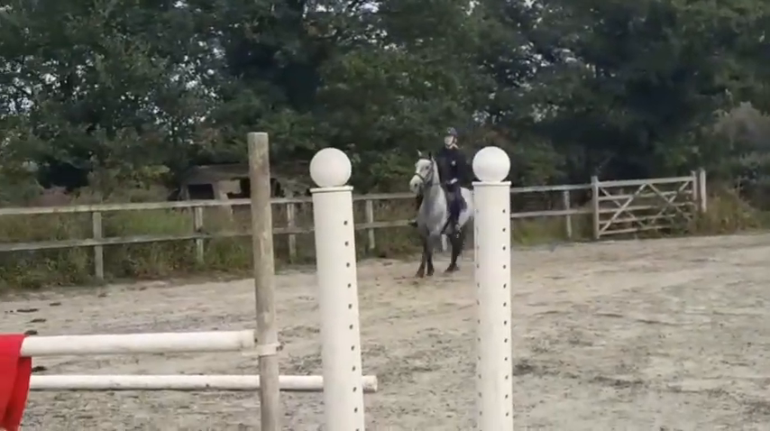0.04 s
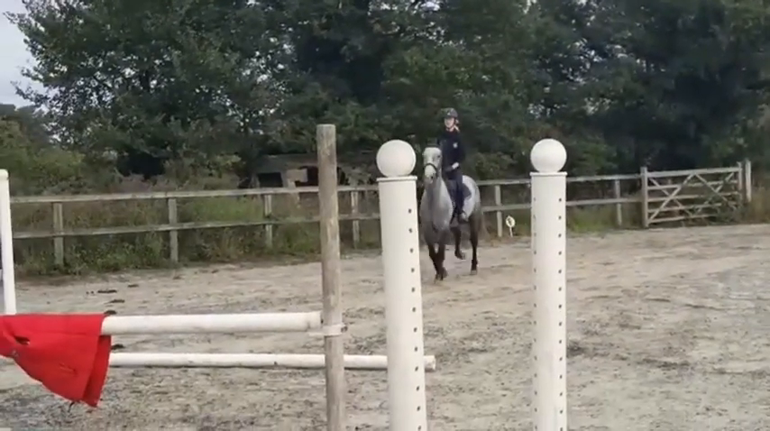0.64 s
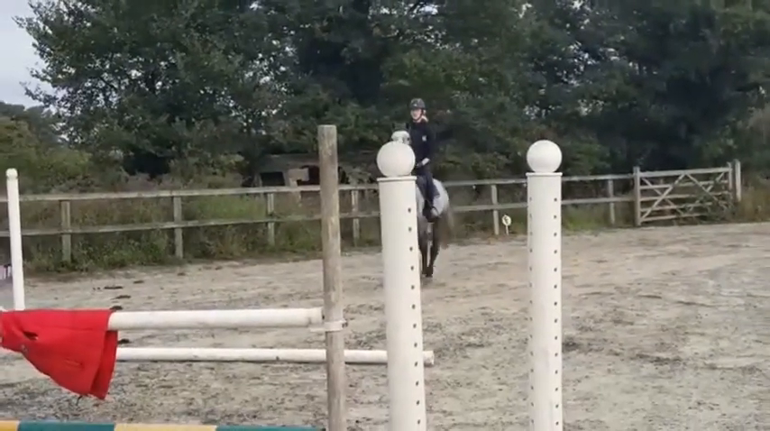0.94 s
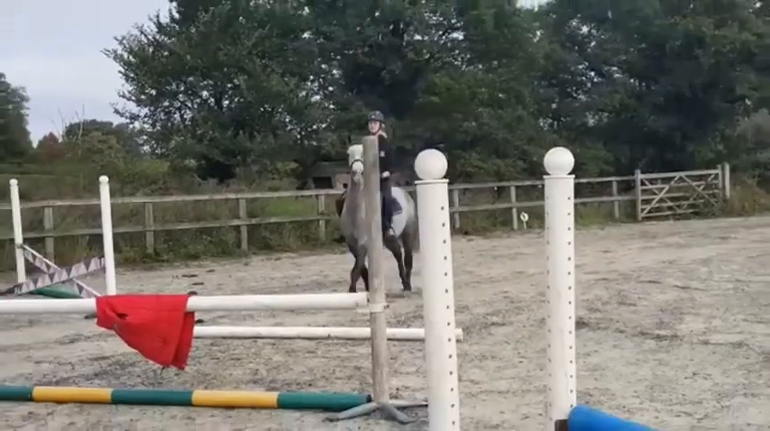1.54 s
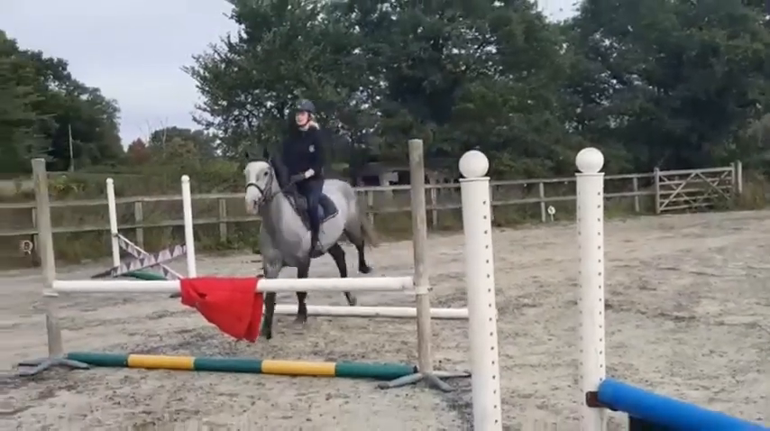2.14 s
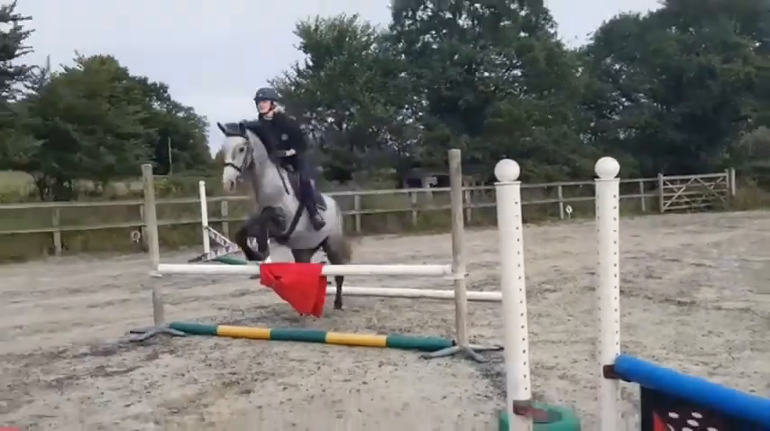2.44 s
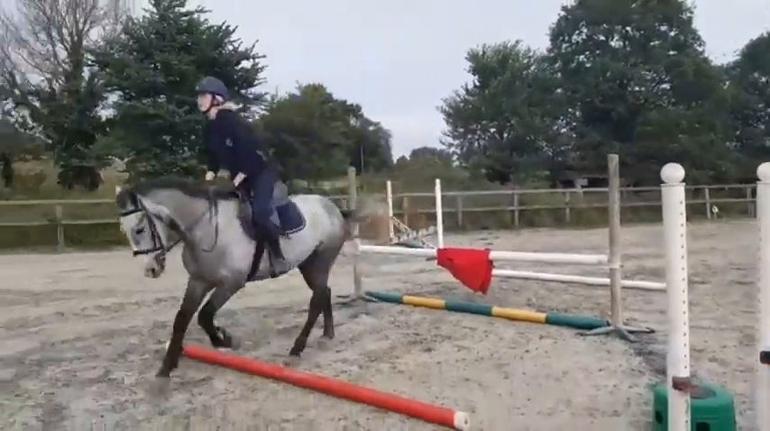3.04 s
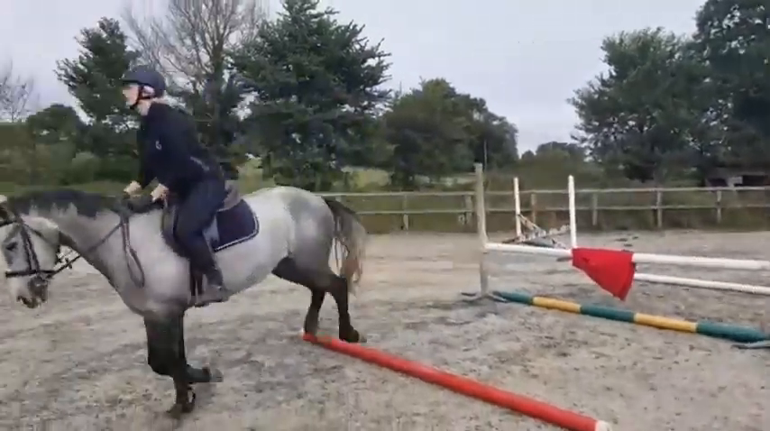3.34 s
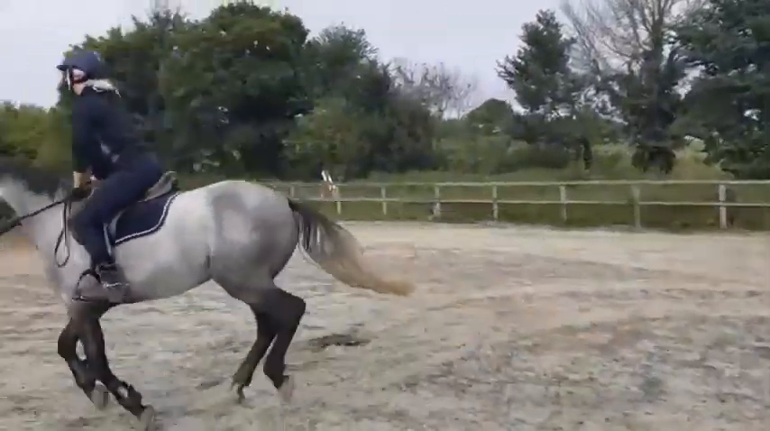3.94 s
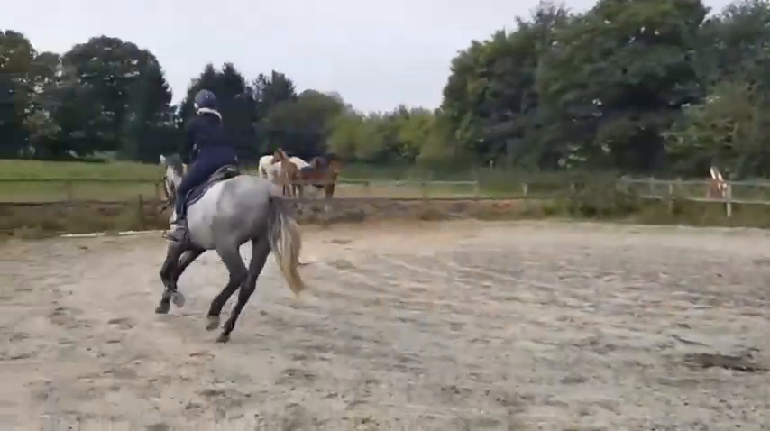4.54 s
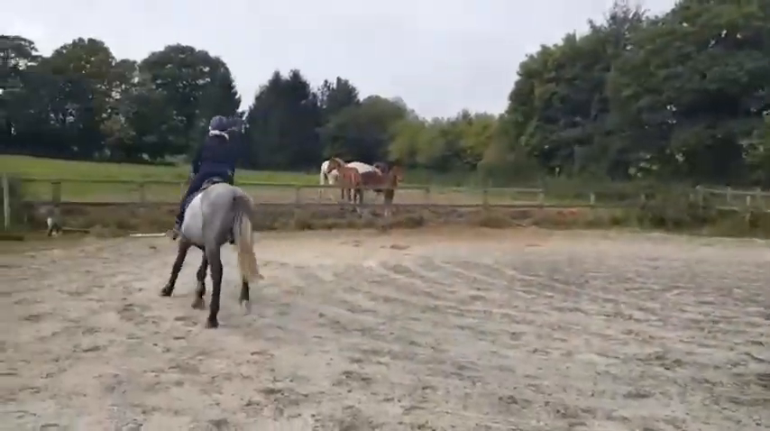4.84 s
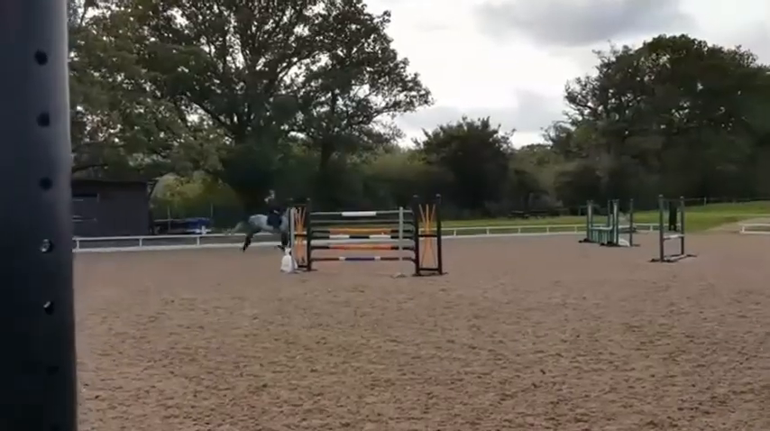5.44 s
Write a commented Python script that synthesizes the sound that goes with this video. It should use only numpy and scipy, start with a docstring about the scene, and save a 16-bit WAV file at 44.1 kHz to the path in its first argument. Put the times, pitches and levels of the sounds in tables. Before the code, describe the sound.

From the start, wind rustles steadily through trees, mostly on the right, and a distant engine idles with a low hum. A horse canters on an outdoor sand arena, its scattered hollow knocks, thumps and scuffs fairly soft at first, with a firmer pair at about 2.1 seconds as it takes off over a jump. It lands around 2.8 seconds with a heavy crunch, cracking grit and grating stones. The horse then passes close, its loudest hoofbeats at about 3.2, 3.9 and 4.4 seconds, while thrown sand hisses down on the left and coarse grains tick. A short creak, like saddle leather, comes at 3.6 seconds. At 4.9 seconds everything cuts to a brief silence. From 5 seconds a much quieter arena follows, with slowly swelling far traffic, a faint motor drone and four tiny bird chirps between 5.1 and 5.4 seconds.

```python
"""A sand riding arena: a horse canters round, hops a pole and passes close by. Each hoof knocks hollow,
thumps the ground and crunches in; stones grate, grit cracks and thrown sand sifts down on the left.
Wind rustles the trees to the right and an engine idles in the distance.
After a short silence the scene changes to a much quieter arena with far traffic, motors and a small bird."""
import sys
import numpy as np
from scipy import signal
from scipy.fft import rfft, irfft, next_fast_len
from scipy.io import wavfile
from scipy.ndimage import map_coordinates

SR = 44100
rng = np.random.default_rng(int(sys.argv[2]) if len(sys.argv) > 2 else 0)


def persist_wave(psi):
    """Save psi, clipped to +-1, as 16-bit WAV."""
    counts = np.round(np.clip(psi, -1, 1) * 32767).astype(np.int16)
    wavfile.write(sys.argv[1], SR, np.atleast_2d(counts).T)


N = 246062
TIME = np.arange(N) / SR

# Hoofbeats. Each row: time in seconds, clop level in dB, clop pitch in Hz, thump level in dB, thump in Hz.
HOOFBEATS = [(0.0765, -24, 590, -46, 213), (0.629, -48, 450, -42, 200), (1.125, -30.5, 536, -38, 170),
             (1.2915, -37, 450, -29, 182), (1.596, -27, 556, -31, 243), (1.7331, -26.5, 650, -36, 263),
             (2.0841, -21, 594, -24.5, 200), (2.1704, -24.5, 430, -14, 192), (2.843, -28.5, 447, -29, 244),
             (2.857, -37, 440, -28, 190), (2.873, -42, 440, -26, 138), (2.901, -37, 700, -29, 139),
             (2.9133, -36, 400, -23.5, 250), (3.2194, -14, 555, -23, 174), (3.232, -29, 800, -33, 150),
             (3.2548, -12, 417, -16, 207), (3.3988, -27.5, 474, -24.5, 215), (3.651, -34, 600, -48, 200),
             (3.793, -31.5, 450, -25.5, 125), (3.9184, -8.5, 664, -13.5, 252),
             (3.9338, -20.5, 580, -34, 263), (4.093, -29.5, 650, -31.5, 227), (4.277, -35, 606, -40, 178),
             (4.4411, -13.5, 656, -24, 241), (4.852, -36, 700, -32, 173)]
# The hoof's hollow ring. Each row: pitch in Hz, level against the clop in dB, swell in seconds.
HOOF_MODES = [(343, -11, 0.0023), (695, -22, 0.0025)]
# The dull crunch of sand packing down. Each row: frequency in Hz, level in dB.
CRUNCH_EQ = [(30, -40), (70, 7.5), (130, -12), (280, 3.5), (450, -9), (650, -7), (1050, -12.5),
             (1350, -13.5), (3000, -35), (6000, -46.5), (12000, -47)]
# Weight on the crunch, greatest as the jump lands. Each row: time in seconds, boost in dB.
CRUNCH_WEIGHT = [(2.75, 7), (2.84, 8), (2.93, 19.5), (3.05, 10.5)]

def hooves():
    """Each sole lands with one pulse; hoof and ground ring, and the sand crunches under the weight."""
    clop_cycles, crunch_db, crunch_db_per_clop_db = 0.57, -33, 0.53
    knocks, crush = np.zeros(N), np.zeros(N)
    lead_s = .01
    t = np.arange(SR // 6) / SR - lead_s
    crush_shape_db = -60 * np.abs(t) / np.where(t < 0, .025, .064)  # quick attack, longer tail
    for s, db, clop_hz, thump_db, thump_hz in HOOFBEATS:
        pulse = np.cos(2 * np.pi * clop_hz * t) * np.exp(-(clop_hz * t / clop_cycles) ** 2)
        hollow = sum(amp(level) * ring(t, hz, swell, order=1) for hz, level, swell in HOOF_MODES)
        thump = amp(thump_db) * ring(t, thump_hz, swell_s=0.0023, order=1)
        add(knocks, s - lead_s, amp(db) * (pulse + hollow) + thump)
        add(crush, s - lead_s, amp(crunch_db_per_clop_db * db + crush_shape_db))
    crunch = amp(curve(CRUNCH_WEIGHT) + crunch_db) * crush * coloured(rng.standard_normal(N), CRUNCH_EQ)
    cushioned = filtered(knocks, lambda hz: 1 / np.sqrt(1 + (hz / 1100) ** 14))  # sand softens the blow
    return (cushioned + crunch) * amp([[-.4], [-.7]])


# Small stones under a hoof. Each row: start in seconds, relative peak in dB, pitch in Hz.
STONE_HITS = [(2.1692, -35.5, 1120), (2.837, -43, 990), (2.843, -29.5, 1330), (2.901, -40, 1350),
              (2.915, -41, 1500), (3.115, -44, 1690), (3.22, -35, 1400), (3.393, -46, 1050),
              (3.465, -47, 1120), (3.596, -40, 2300), (3.9177, -33.5, 2250), (4.0915, -42.5, 1650),
              (4.169, -37.5, 1820), (4.501, -41.5, 1690), (4.654, -40, 1780)]

def stones():
    """A struck stone grates for a few milliseconds against its neighbours."""
    out, t = np.zeros((2, N)), np.arange(SR // 25) / SR
    for s, db, hz in STONE_HITS:
        contacts = rng.standard_normal((2, len(t))) * amp(-60 * t / .024)
        grate = signal.fftconvolve(contacts, ring(t, hz, swell_s=0.76 / hz)[None], axes=1)
        add(out, s, amp(db + 9.0) * grate / np.abs(grate).max(axis=1, keepdims=True))
    return out


# Coarse grit cracking under a hoof. Each row: start in seconds, relative peak in dB.
GRIT_CRACKS = [(2.836, -19.5), (3.061, -38), (3.115, -32), (3.2162, -29), (3.244, -40), (3.252, -24),
               (3.393, -26.5), (3.64, -43), (3.76, -26), (3.9177, -22), (3.98, -45), (4.122, -37),
               (4.169, -26.5), (4.3467, -25), (4.348, -30), (4.469, -28), (4.741, -34), (4.793, -37)]
# Their bright snap. Each row: frequency in Hz, level in dB.
CRACK_EQ = [(600, -29), (2000, -26), (3200, -24), (4200, 17), (5000, -6), (6200, 2.5), (8500, -4),
            (12000, -7.5), (15500, -20)]

def cracks():
    """Grit gives way at once, in a quickly fading cluster of sharp clicks."""
    out, t = np.zeros((2, N)), np.arange(SR // 25) / SR
    colour = amp(along(CRACK_EQ, np.fft.rfftfreq(2 * len(t), 1 / SR)))
    decay_s = 0.016
    for s, db in GRIT_CRACKS:
        clicks = rng.standard_normal((2, len(t))) ** 3 * amp(-60 * t / decay_s)
        burst = irfft(rfft(clicks, 2 * len(t)) * colour)[:, :len(t)]
        add(out, s, amp(db - 2.0) * burst / np.abs(burst).max(axis=1, keepdims=True))
    return out


# Hooves dragging or digging in. Each row: start in seconds, relative level in dB, swell in seconds.
SCUFFS = [(0.14, -58.5, 0.038), (0.328, -55, 0.019), (0.508, -52, 0.008), (0.845, -51, 0.027),
          (0.925, -55, 0.013), (1.025, -56, 0.017), (1.168, -46, 0.02), (1.297, -48, 0.012),
          (1.52, -55, 0.032), (1.583, -47, 0.029), (1.696, -46.5, 0.016), (1.86, -54, 0.026),
          (2.078, -47.5, 0.017), (2.167, -48.5, 0.0027), (2.214, -52.5, 0.017), (2.277, -52.5, 0.015),
          (2.355, -54.5, 0.028), (2.42, -55, 0.04), (2.503, -52, 0.017), (2.835, -46, 0.0039),
          (2.842, -55.5, 0.033), (2.896, -49, 0.0066), (3.052, -53, 0.0092), (3.11, -51.5, 0.0037),
          (3.214, -52.5, 0.005), (3.25, -42.5, 0.0028), (3.39, -52.5, 0.0016), (3.462, -70, 0.0058),
          (3.635, -48.5, 0.013), (3.755, -50, 0.0097), (3.775, -52.5, .014), (3.915, -38, 0.0022),
          (3.934, -56, 0.018), (3.976, -46.5, 0.0033), (4.164, -47.5, 0.012), (4.308, -52, 0.013),
          (4.341, -48, 0.0043), (4.465, -62, 0.0035), (4.682, -52.5, 0.017), (4.788, -56.5, 0.015)]

def sand_flow():
    """How much sand is moving: a swell for each scuff, each landing and the light shuffles in between."""
    kick_db, kick_db_per_clop_db, kick_swell_s = -47.5, 0.34, 0.0051
    shuffles_per_s, shuffle_db, shuffle_swell_s = 4.1, -63.5, 0.036
    kicks = [(s, kick_db + kick_db_per_clop_db * db, kick_swell_s) for s, db, *_ in HOOFBEATS]
    shuffle_times = (np.arange(64) + rng.random(64)) / shuffles_per_s
    shuffles = [(s, shuffle_db, shuffle_swell_s) for s in shuffle_times]
    clumps = unit(amp(2.5 * np.tanh(wobble(per_second=150))))  # sand gives way in small uneven slips
    return clumps * swells(SCUFFS + kicks + shuffles)


# Bright grain collisions. Each row: frequency in Hz, level in dB.
COLLISION_EQ = [(200, 14.5), (700, 11.5), (1500, 20), (2300, -36), (3200, 15), (4300, 7.5), (5600, 13),
                (6700, 9.5), (8300, 14), (10300, 0), (12000, 2), (15500, -16)]
# The rasp of shearing sand. Each row: frequency in Hz, level in dB.
RASP_EQ = [(400, -35.5), (1000, -1), (1600, 2.5), (2250, 10.5), (3100, -0.5), (3750, 5.5), (4600, 0),
           (5500, 3), (6500, -20), (12000, -41)]

def scuffs(flow, close):
    """Moving grains collide and shear; as close goes from 0 to 1 the rasp gets softer and wider."""
    collisions = coloured(grains(per_second=8000, spread_db=4.0), COLLISION_EQ)
    far_rasp = amp(7) * from_afar(grains(per_second=3300, spread_db=-3.5)[0], RASP_EQ, around_db=-2)
    close_rasp = amp(-0.5) * coloured(rng.standard_normal((2, N)), RASP_EQ)
    return flow * (amp(0.75 + 0.5 * close) * collisions + (1 - close) * far_rasp + close * close_rasp)


# Handfuls of thrown sand. Each row: start in seconds, level in dB, swell in seconds.
SAND_THROWS = [(3.385, -43, 0.0067), (3.462, -43, 0.007), (3.66, -44, 0.054), (3.818, -39, 0.027),
               (3.925, -39.5, 0.023), (4.114, -41, 0.0059), (4.228, -48.5, 0.02), (4.31, -49, 0.041),
               (4.455, -42.5, 0.016)]
PASS_S, PASS_M, SPEED_M_PER_S = 4.12, 2.23, 5.3  # the horse at its nearest point

def spray_level():
    """Sifting sand grows as the horse passes and surges with each thrown handful."""
    nearest_db, far_db = -46.5, -59
    nearness = PASS_M / np.hypot(PASS_M, SPEED_M_PER_S * (TIME - PASS_S))
    spurts = amp(1.9 * wobble(per_second=18))  # the sand falls unevenly
    trickle = np.hypot(amp(nearest_db) * nearness, amp(far_db)) * spurts
    return np.hypot(trickle, swells(SAND_THROWS))


# The fine hiss of sifting sand. Each row: frequency in Hz, level in dB.
HISS_EQ = [(1200, -40), (2000, -4), (2400, -4), (3200, -4.5), (3800, 3), (4250, 4.5), (4800, -9),
           (5600, -17), (8200, -5), (10000, -21.5), (12000, -16.5), (15500, -51)]
# The dry tick of coarse grains. Each row: frequency in Hz, level in dB.
GRIT_EQ = [(1500, 9), (3000, 5), (4500, 3), (6300, -1.5), (8500, -17), (12000, -17), (15500, -14.5)]

def sand():
    """Hooves scuff the sand and throw it up to hiss down on the left; single coarse grains tick in both."""
    close_s, closing_s, close_left_db = 2.55, 0.17, 7.5  # the horse comes close, on the left
    close = .5 + .5 * np.tanh((TIME - close_s) / closing_s)
    flow = sand_flow() * amp(np.outer([1, 0], close_left_db * close))
    scuffing = scuffs(flow, close)
    spray = spray_level()
    sifting = spray * coloured(grains(per_second=8500, spread_db=-2.0), HISS_EQ) * amp([[0], [-19]])
    tick_level = spray * amp([[-8], [-13]]) + amp(-5.5) * flow
    ticks = tick_level * coloured(grains(per_second=250, spread_db=-4.5), GRIT_EQ)
    return scuffing + sifting + ticks


def flung_grit():
    """Large grains flung by the passing hooves land one by one, each with a dry tick."""
    per_second, spread_db, decay_s = 68, 0.5, .003
    hits = rng.random(N) < per_second / SR
    sizes = hits * amp(spread_db * rng.standard_normal((2, N)))
    t = np.arange(SR // 100) / SR
    envelopes = signal.fftconvolve(sizes, amp(-60 * t / decay_s)[None], axes=1)[:, :N]
    around_pass = np.interp(TIME - PASS_S, [-.5, -.2, .5, 1], [0, 1, 1, .5])
    return amp(-56.5) * around_pass * coloured(envelopes * rng.standard_normal((2, N)), GRIT_EQ)


# Creaks, perhaps saddle leather. Each row: start in seconds, level in dB, pitch in Hz, swell in seconds.
CREAKS = [(0.269, -48, 1245, 0.006), (3.607, -34, 826, 0.0036)]

def creaks():
    """Each creak is one narrow resonance that swells and fades."""
    out, t = np.zeros(N), np.arange(SR // 10) / SR
    for s, db, hz, swell in CREAKS:
        add(out, s, amp(db) * ring(t, hz, swell))
    return out


# The rise and fall of the wind. Each row: time in seconds, relative level in dB.
GUSTS = [(0.0, -48), (0.3, -46.5), (0.65, -50), (1.1, -46), (1.75, -44.5), (2.15, -46.5), (2.5, -47.5),
         (2.75, -47.5), (3.45, -48), (3.75, -46.5), (4.05, -51.5), (4.8, -49.5)]
# The rustle of leaves. Each row: frequency in Hz, level in dB.
LEAF_EQ = [(450, -2.5), (900, 6.5), (1200, 0.5), (1550, 3), (2300, 0), (3100, -4), (3700, -7), (4400, -7.5),
           (5500, -7.5), (6300, -17.5), (8300, -13.5), (10500, -25.5), (12000, -24), (15000, -32.5)]

def trees():
    """Countless leaf clicks merge into a rush in the wind, from the right and from all around."""
    leaves = from_afar(grains(per_second=14000, spread_db=3.0)[0], LEAF_EQ, around_db=-7.0)
    rush = filtered(leaves, lambda hz: hz ** 2 / (hz ** 2 + 200 ** 2))
    flutter_db = .8 * wobble(12)
    return amp(curve(GUSTS) + 2.0 + flutter_db) * rush


# The engine's hum. Each row: multiple of the idle rate, relative level in dB.
ENGINE_ORDERS = [(2, -19), (4, -8), (5, -4), (6, 0), (10, -2.5)]
# Its low rumble. Each row: frequency in Hz, level in dB.
RUMBLE_EQ = [(15, -41), (28, -13), (42, -4), (60, -9.5), (85, 1.5), (120, -4), (155, 6.5), (200, -0.5),
             (265, -5.5), (310, -16), (370, -32), (480, -14), (600, -28), (1200, -60)]
# Its faint whine. Each row: pitch in Hz, relative level in dB.
WHINE_TONES = [(1497, -55.5), (1626, -87), (1744, -59), (1820, -54), (1981, -59.5)]

def engine():
    """A distant idling engine: low orders over a throbbing rumble, and a fuzzy whine that comes and goes."""
    idle_hz = 23.57
    cycles = np.cumsum(idle_hz * (1 + 0.003726 * wobble(3.143))) / SR
    hum = unit(sum(amp(db + 1.15 * wobble(4.45)) * np.sin(2 * np.pi * (order * cycles + rng.random()))
                   for order, db in ENGINE_ORDERS))
    rumble = coloured(rng.standard_normal(N) + amp(-8.5) * rng.standard_normal((2, N)), RUMBLE_EQ)
    whine_level = amp(curve([(0, -17), (1.3, -8), (1.8, -1), (2.6, -5), (3.1, -20)]))
    whine = whine_level * tones(WHINE_TONES, drift_hz=9, flutter_db=1.5, drifts_per_s=60)
    level = amp(curve([(2.8, -40), (7.9, -42)]))  # eases off as the listener turns away
    return level * (amp(-3.0) * hum + amp(-1) * rumble) + whine


# The roar of far roads. Each row: frequency in Hz, level in dB.
TRAFFIC_EQ = [(12, -50), (20, -14), (42, -4.5), (58, -6), (74, 1.5), (98, -2.5), (130, -11), (250, -10.5),
              (400, -10.5), (480, -20), (570, -8.5), (700, -14.5), (1100, -14.5), (15500, -44.5)]

def far_traffic():
    """Traffic slowly swells, centred in the bass and wide above, with a faint hiss on the left."""
    centre = filtered(rng.standard_normal(N), lambda hz: 1 / (1 + (hz / 900) ** 2))
    wide = filtered(rng.standard_normal((2, N)), lambda hz: hz / (hz + 700))
    roar = amp(curve([(4.98, -56), (5.25, -53), (5.58, -51)])) * coloured(centre + wide, TRAFFIC_EQ)
    hiss = coloured(rng.standard_normal((2, N)), HISS_EQ) * amp([[-68], [-80]])
    return roar + hiss


# A far bird's chirps. Each row: start in seconds, relative level in dB.
CHIRPS = [(5.127, -49), (5.16, -54), (5.255, -50), (5.38, -54)]

def bird():
    """Each chirp arches up to its top pitch and wavers; the hedge blurs it with a short echo."""
    chirp_s, top_hz, arch_hz, waver_hz, echo_s = 0.024, 3400, 300, 110, 0.063
    song, progress = np.zeros(N), np.linspace(0, 1, round(chirp_s * SR))
    for s, db in CHIRPS:
        pitch = top_hz - arch_hz * (2 * progress - 1) ** 2 + waver_hz * wobble(430)[:len(progress)]
        add(song, s, amp(db) * np.sin(np.pi * progress) * np.sin(2 * np.pi * np.cumsum(pitch) / SR))
    echo = rng.standard_normal((2, SR // 6)) * amp(-60 * np.arange(SR // 6) / SR / echo_s)
    return .5 * signal.fftconvolve(song[None], echo / np.linalg.norm(echo[0]), axes=1)[:, :N]


# The drone behind the quiet arena. Each row: pitch in Hz, relative level in dB.
MOTOR_TONES = [(74, -52.5), (148, -61.5), (221.4, -65), (295, -63), (462.4, -62), (558.5, -64), (632, -76),
               (1008, -67)]

def far_motors():
    """Distant motors hold a bed of slightly unsteady tones."""
    return amp(-4.0) * tones(MOTOR_TONES, drift_hz=2.54, flutter_db=1.0, drifts_per_s=14)


# Far sounds shift as the listener turns. Each row: time in seconds, lag of the left side in seconds.
LEFT_LAG = [(0, .0005), (2.8, .0005), (3.35, .00043), (3.7, .00031), (3.87, .00024), (4.2, 0),
            (4.7, -.0001)]

def from_afar(x, spectrum, around_db):
    """A far sound: x arrives from one direction, with noise of the same colour from all around."""
    direct = coloured(x, spectrum)
    left = map_coordinates(direct, [(TIME - curve(LEFT_LAG)) * SR])
    around = amp(around_db) * coloured(rng.standard_normal((2, N)), spectrum)
    return unit(np.array([left, direct]) + around)


def ring(t, hz, swell_s, order=2):
    """A damped resonance, softly struck at t = 0 and loudest at swell_s; a lower order rings longer."""
    u = np.maximum(t, 0) / swell_s
    return np.sin(2 * np.pi * hz * t) * (u * np.exp(1 - u)) ** order


def swells(rows):
    """The joint level of (s, dB, swell s) surges, each peaking after its swell time and dying away."""
    power, t = np.zeros(N), np.arange(SR // 4) / SR
    for s, db, swell in rows:
        u = t / max(swell, .0005)
        add(power, s, (amp(db) * (u * np.exp(1 - u)) ** 2) ** 2)
    return np.sqrt(power)


def grains(per_second, spread_db):
    """Two unrelated streams of tiny clicks of uneven size."""
    present = rng.random((2, N)) < per_second / SR
    return present * rng.standard_normal((2, N)) * amp(spread_db * rng.standard_normal((2, N)))


def tones(lines, drift_hz, flutter_db, drifts_per_s):
    """(Hz, dB) tones that wander in pitch and flutter in level."""
    out = np.zeros(N)
    for hz, db in lines:
        phase = 2 * np.pi * np.cumsum(hz + drift_hz * wobble(drifts_per_s)) / SR
        out += np.sqrt(2) * amp(db + flutter_db * wobble(8.0)) * np.sin(phase)
    return out


def wobble(per_second):
    """A curve gliding between random values."""
    knots = rng.standard_normal(int(N * per_second / SR) + 4)
    return 1.28 * np.interp(TIME * per_second, np.arange(len(knots)), knots)


def coloured(x, spectrum):
    """x through a (Hz, dB) EQ, at rms 1."""
    return unit(filtered(x, lambda hz: amp(along(spectrum, hz))))


def filtered(x, response):
    """x through a gain that depends on frequency."""
    size = next_fast_len(N + 8192)
    return irfft(rfft(x, size) * response(np.fft.rfftfreq(size, 1 / SR)), size)[..., :N]


def along(points, hz):
    """(Hz, dB) points joined on a log frequency axis."""
    points_hz, db = np.transpose(points)
    return np.interp(np.log(hz + 1), np.log(points_hz + 1), db)


def curve(rows):
    """(s, value) rows as one value per sample."""
    return np.interp(TIME, *np.transpose(rows))


def add(track, s, sound):
    """Mix a sound into a track from time s."""
    part = track[..., round(s * SR):][..., :sound.shape[-1]]
    part += sound[..., :part.shape[-1]]


def amp(db):
    return 10 ** (np.asarray(db) / 20)


def unit(x):
    return x / np.sqrt(np.mean(x ** 2) + 1e-20)


def scene():
    """The horse's arena, a short silence, then the quiet arena."""
    horse_ends_s, quiet_starts_s = 4.91, 4.976
    horse_arena = hooves() + stones() + cracks() + creaks() + sand() + flung_grit() + trees() + engine()
    quiet_arena = far_traffic() + bird() + far_motors()
    return horse_arena * (TIME < horse_ends_s) + quiet_arena * (TIME > quiet_starts_s)


# The colour of the left channel. Each row: frequency in Hz, gain over the right in dB.
LEFT_EQ = [(60, 1.5), (110, 0.5), (200, 1.5), (380, 2), (700, 1.5), (1290, 2), (2380, 4.5), (4400, 7),
           (8120, -6), (15000, 2)]

def record(dry):
    """Colour the left channel and cut the deepest bass and the highest treble."""
    low_cut_hz, high_cut_hz = 30, 15500
    dry = signal.sosfilt(signal.butter(2, low_cut_hz, "highpass", fs=SR, output="sos"), dry)
    return filtered(dry, lambda hz: np.array([amp(along(LEFT_EQ, hz)), np.ones_like(hz)]) * (hz < high_cut_hz))


dry = scene()
out = record(dry)
persist_wave(out)
```